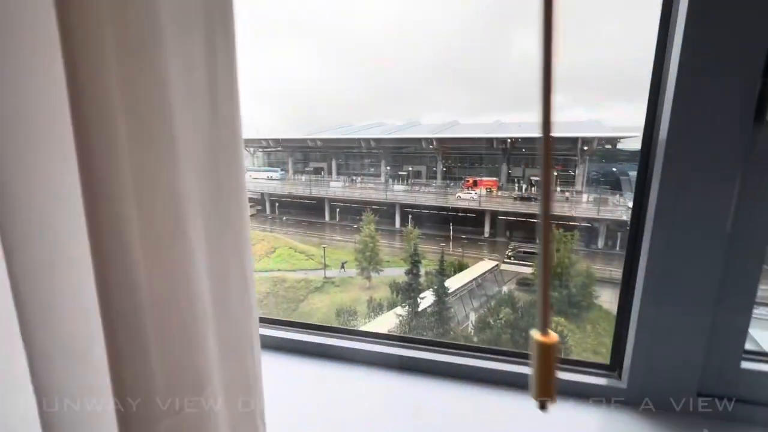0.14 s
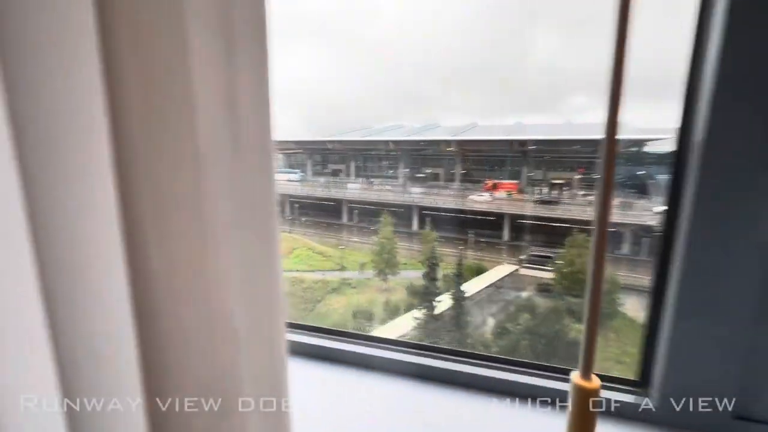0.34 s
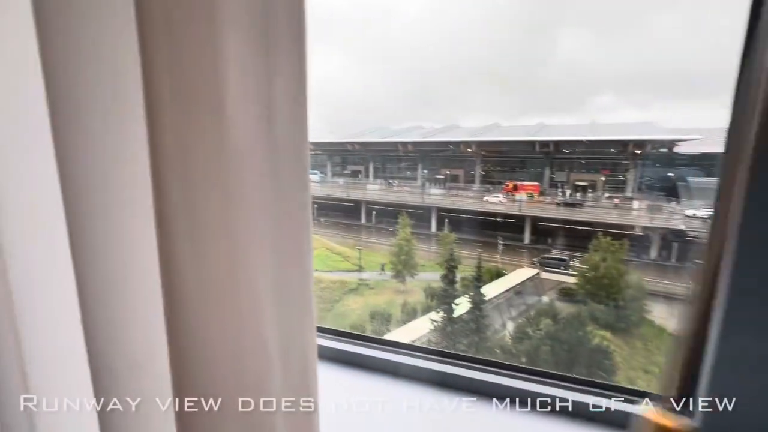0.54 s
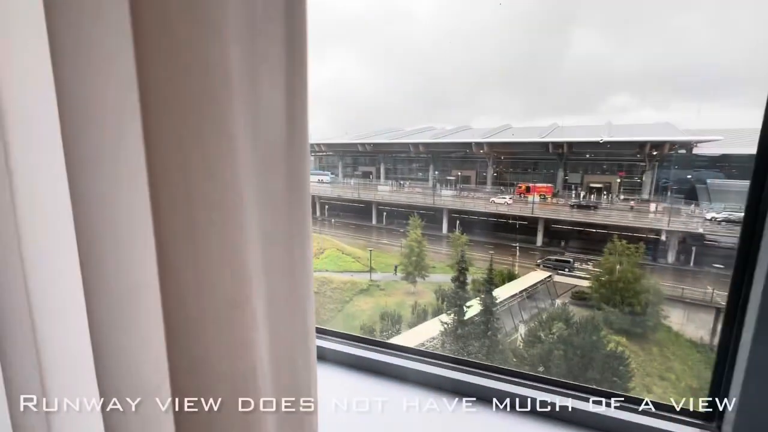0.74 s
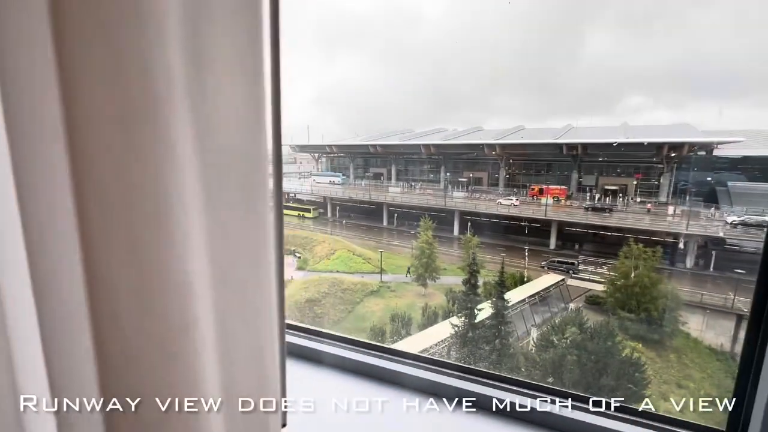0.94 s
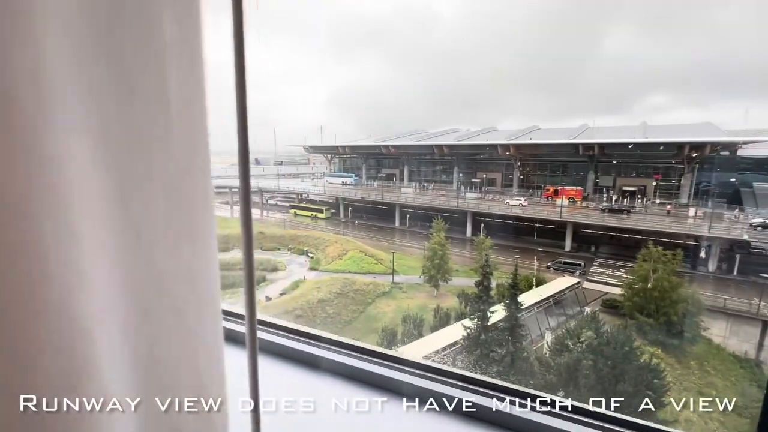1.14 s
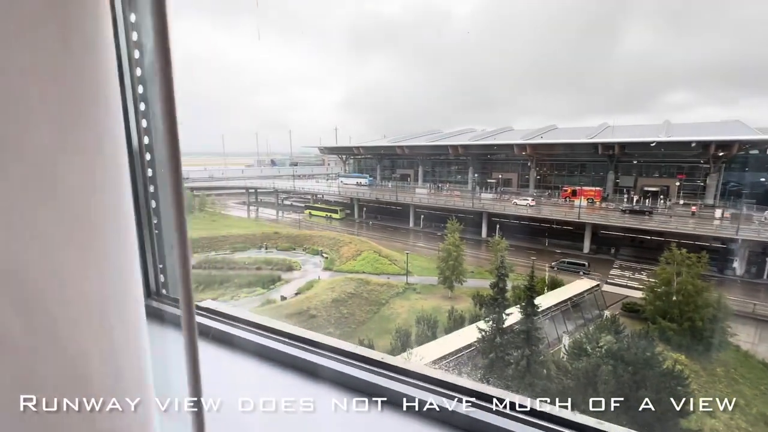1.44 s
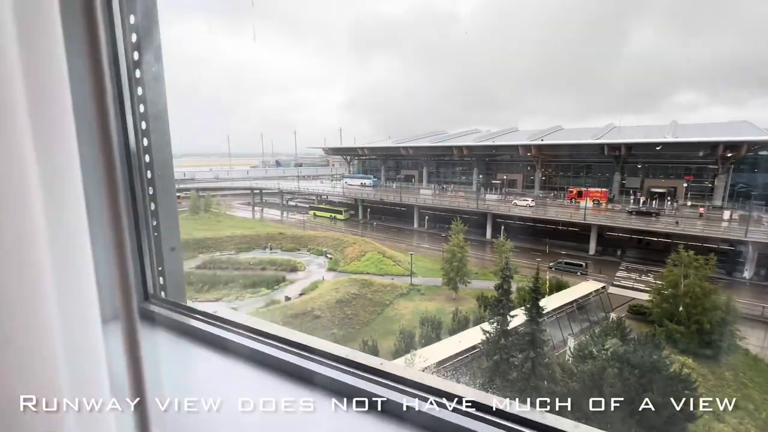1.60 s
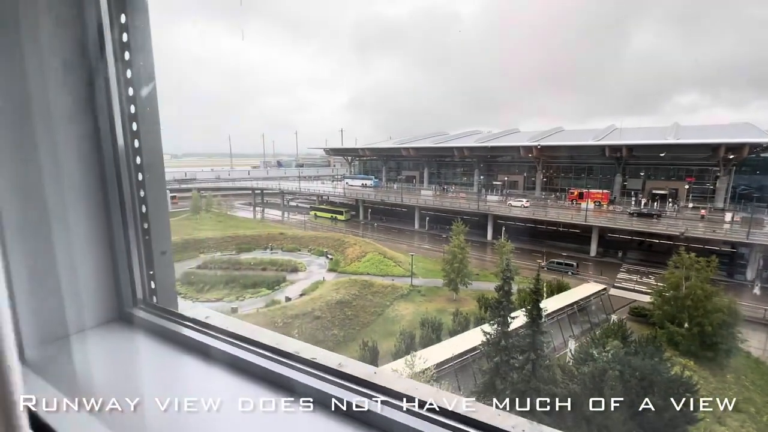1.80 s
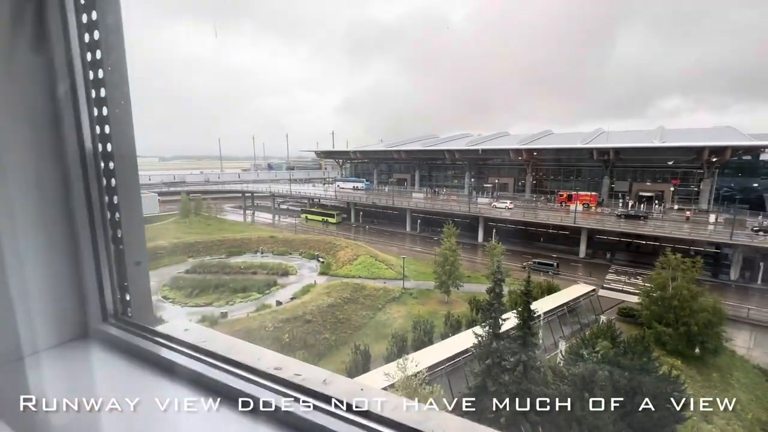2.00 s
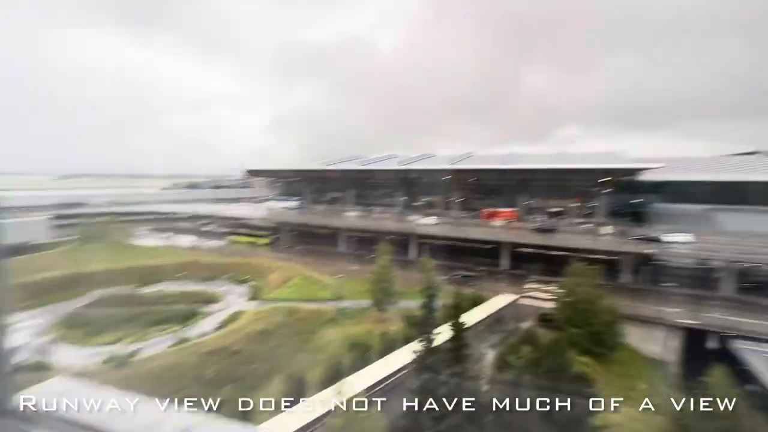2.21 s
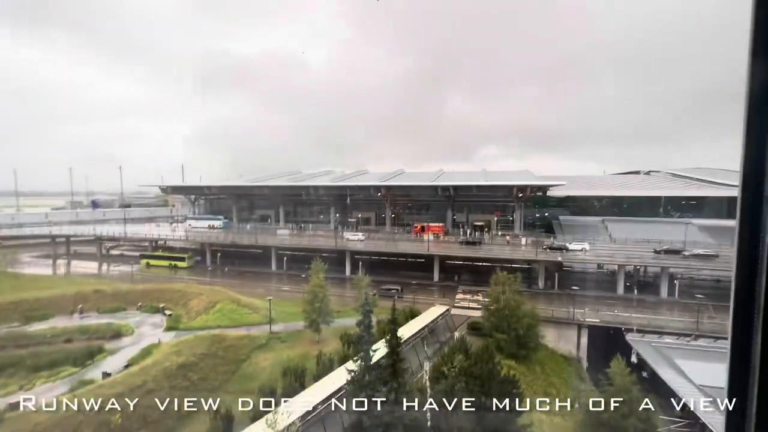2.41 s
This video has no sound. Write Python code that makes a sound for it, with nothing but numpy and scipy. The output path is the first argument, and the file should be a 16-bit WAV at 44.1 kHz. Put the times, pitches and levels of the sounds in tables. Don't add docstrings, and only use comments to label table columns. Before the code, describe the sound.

A curtain is drawn along its track, close up in a quiet room. From about 0.2 to 0.7 seconds gliders rub and make the rail sing, with small ticks until 1.1. At 1.3 they strike the end stop and pile up in clattering knocks, fading by 1.8. At 2.14 a rod cracks and thuds loudly on the window; a softer rebound and cloth rustle follow at 2.3. Low rumble, faint hum and hiss throughout.

```python
import sys
import numpy as np
from scipy import signal
from scipy.fft import rfft, irfft, next_fast_len
from scipy.io import wavfile
from scipy.ndimage import uniform_filter1d, map_coordinates

SR = 44100
rng = np.random.default_rng(int(sys.argv[2]) if len(sys.argv) > 2 else 0)


def file_out(sig):
    cols = np.atleast_2d(sig).T
    lim = np.clip(cols, -1, 1)
    pcm = np.round(lim * 32767).astype(np.int16)
    wavfile.write(sys.argv[1], SR, pcm)


def to_linear_factor(level_db):
    exponent = np.asarray(level_db, float) / 20
    return 10 ** exponent


N = 112454
TIME_S = np.arange(N) / SR


def unit(x):
    return x / np.sqrt(np.mean(x ** 2) + 1e-20)


def along(points, hz):
    f, v = np.transpose(points)
    return np.interp(np.log(hz + 1), np.log(f + 1), v)


def curve(rows):
    s, db = np.transpose(rows)
    return to_linear_factor(np.interp(TIME_S, s, db, -120, -120))


def wobble(rate_hz):
    knots = rng.standard_normal(int(N * rate_hz / SR) + 4)
    return map_coordinates(knots, [np.arange(N) * rate_hz / SR])


def filtered(x, response):
    n = x.shape[-1]
    m = next_fast_len(n + 8192)
    return irfft(rfft(x, m) * response(np.fft.rfftfreq(m, 1 / SR)), m)[..., :n]


def resonant(peaks):
    def response(f):
        total = 0
        for k, (hz, width_hz, db) in enumerate(peaks):
            band = 1j * f * width_hz
            total = total + (-1) ** k * to_linear_factor(db) * band / (hz * hz - f * f + band)
        return total
    return response


def squared(hz, width_hz):
    return lambda f: resonant([(hz, width_hz, 0)])(f) ** 2


def shaped(points):
    return lambda hz: to_linear_factor(along(points, hz))


# freq_hz, likeness_0_to_1
LIKENESS = [(60, 1), (300, 0.82), (1000, 0.32), (4000, 0.062), (10000, 0.13), (12000, 0.64)]


def pair(n, lag_s=0, close=0):
    def mid_side(hz):
        likeness = close + (1 - close) * along(LIKENESS, hz)
        turn = np.arccos(np.clip(likeness, -1, 1)) / 2
        return np.array([np.cos(turn), np.sin(turn)])
    mid, side = filtered(rng.standard_normal((2, n)), mid_side)
    return np.array([np.roll(mid + side, round(lag_s * SR)), mid - side])


def rush(response, patchy_db):
    z = signal.stft(pair(N), nperseg=512)[2]
    field = rng.standard_normal(z.shape[1:])
    field = uniform_filter1d(field, size=6, axis=0)
    field = uniform_filter1d(field, size=8, axis=1)
    noise = signal.istft(z * to_linear_factor(patchy_db * unit(field)), nperseg=512)[1][:, :N]
    return unit(filtered(noise, response))


def add(out, start_s, peak_db, t60_s, pan_db, response, attack_s):
    lag_s, close, grit_db = 0.0004, 0.61, 3
    t = np.arange(SR // 4) / SR
    noise = pair(len(t), lag_s, close)
    grit = np.repeat(rng.standard_normal(len(t)), 30)[:len(t)]
    decay = to_linear_factor(grit_db * grit - 60 * t / max(t60_s, 0.003))
    x = filtered(noise * decay * (1 - np.exp(-t / attack_s)), response)
    x *= to_linear_factor([[peak_db + pan_db / 2], [peak_db - pan_db / 2]]) / np.abs(x).max(1, keepdims=True)
    k = round(start_s * SR)
    out[:, k:k + len(t)] += x[:, :N - k]


# time_s, level_db
RUMBLE_SWELL = [(0, -55.5), (.4, -54), (.65, -50.5), (.9, -56), (1.5, -49), (1.9, -52), (2.55, -48)]
# freq_hz, density_db
RUMBLE_SPECTRUM = [(12, -57), (20, -42), (54, 2.5), (70, -1), (114, -8), (141, -9.5), (260, -19.5),
                   (340, -43), (570, -120)]


def rumble():
    return curve(RUMBLE_SWELL) * to_linear_factor(2.0 * wobble(20)) * rush(shaped(RUMBLE_SPECTRUM), patchy_db=-0.9)


# freq_hz, rms_db
MAINS = [(300, -62.5)]


def hum():
    out = np.zeros((2, N))
    for hz, rms_db in MAINS:
        level = to_linear_factor(rms_db + 3.5 + 0.15 * wobble(22.0))
        phase = 0.074 * wobble(7.2) + np.array([[0], [0.5]])
        out += level * np.sin(2 * np.pi * hz * TIME_S + phase)
    return out


# freq_hz, density_db
AIR_SPECTRUM = [(150, -62), (250, -5), (900, -12), (2200, -11.5), (2700, -23), (4700, -22), (10000, -25.5),
                (12000, -31.5), (16000, -29)]


def air():
    level_db, turn_s, turn_db = -63, 1.68, -7
    turned = 1 / (1 + np.exp((turn_s - TIME_S) / 0.034))
    return to_linear_factor(level_db + turn_db * turned) * rush(shaped(AIR_SPECTRUM), patchy_db=3.5)


# time_s, level_db
CLOTH_SETTLING = [(1.74, -73), (1.82, -75), (1.94, -67), (1.96, -63), (2.1, -69.5), (2.22, -59.5),
                  (2.27, -53), (2.31, -62.5), (2.46, -70), (2.5, -61), (2.55, -69)]
# freq_hz, density_db
CLOTH_SPECTRUM = [(300, 0), (800, 4.5), (2200, -1), (3200, -11), (5500, -15.5), (7500, -28), (15000, -21)]


def cloth():
    return curve(CLOTH_SETTLING) * rush(shaped(CLOTH_SPECTRUM), patchy_db=3.5)


# start_s, wave_db, wave_crest_s (after start), ring_db
WINDOW_BLOWS = [
    (1.302, -23, 0.0034, -33),
    (2.129, -26.5, 0.014, -56),
    (2.1415, -3, 0.0065, -13),
    (2.326, -32.5, 0.0067, -37),
]
# freq_hz, level_db, t60_s
PANE_MODES = [(63.9, -10.5, 0.9), (81.4, 6.5, 0.15), (133.5, 0, 0.17), (174.2, -4, 0.28),
              (268.6, -4.5, 0.24), (311, -2, 0.19), (367, 0, 0.17)]


def thuds():
    pan_db, left_lag_s = -6.5, 0.001
    turns, first_crest_s = 1.45, 0.004
    out = np.zeros((2, N + SR))
    t = np.maximum(np.arange(SR) / SR - np.array([[left_lag_s], [0]]), 1e-6)
    for start_s, wave_db, crest_s, ring_db in WINDOW_BLOWS:
        u = t / crest_s
        swell = (u * np.exp((1 - u ** 2) / 2)) ** 0.78 * (1 - np.exp(-(u / 0.39) ** 4))
        wave = swell * np.cos(2 * np.pi * turns * np.log(t / first_crest_s))
        ring = sum(to_linear_factor(db - 60 * t / t60_s) * np.sin(2 * np.pi * hz * t) for hz, db, t60_s in PANE_MODES)
        ring = ring * (1 - np.exp(-(u / 3.5) ** 2))
        k = round(start_s * SR)
        out[:, k:k + SR] += to_linear_factor(wave_db) * wave + to_linear_factor(ring_db) * ring
    return out[:, :N] * to_linear_factor([[pan_db], [0]])


def rebound():
    start_s, level_db, hz, t60_s, pan_db = 2.3305, -18, 63, 0.14, 2
    u = np.maximum(TIME_S - start_s, 0)
    onset = 1 - np.exp(-(u / 0.007) ** 2)
    flex = to_linear_factor(level_db - 60 * u / t60_s) * onset * np.cos(2 * np.pi * hz * u)
    return flex * to_linear_factor([[pan_db / 2], [-pan_db / 2]])


# start_s, peak_db, t60_s
TIP_CRACK = (2.1415, -8, 0.015)
# freq_hz, width_hz, level_db
ROD_MODES = [(1095, 370, 2.5), (1490, 430, 0), (2350, 390, -6), (5500, 1700, -21), (8900, 3000, -15)]


def rod():
    out = np.zeros((2, N))
    tip = lambda f: resonant(ROD_MODES)(f) / (1 + (f / 4000) ** 2) ** 0.5
    add(out, *TIP_CRACK, 0.5, tip, attack_s=0.00077)
    add(out, TIP_CRACK[0], -22, 0.06, 1.5, squared(500, 350), attack_s=0.0085)
    return out


def end_stop(out):
    add(out, 1.3055, -16, 0.035, 4, squared(3200, 1300), attack_s=0.006)


# start_s, peak_db, t60_s, left_minus_right_db
RAIL_PINGS = [
    (1.352, -40.5, 0.025, 8),
    (1.404, -36.5, .02, 5),
    (1.442, -43.5, 0.028, -1),
    (1.534, -36.5, 0.028, -1.5),
    (1.678, -52, 0.045, 6.5),
    (.275, -43.5, 0.025, 1),
    (0.6647, -33, 0.018, -7),
    (1.0886, -26, 0.02, 0.5),
    (1.2326, -53, 0.015, 2.5),
    (1.3853, -32.5, 0.0096, 3),
]


def pings(out):
    modes = resonant([(1100, 130, 8), (1230, 163, 0), (2900, 2000, -16)])
    rail = lambda f: modes(f) * squared(1500, 1800)(f)
    for start_s, peak_db, t60_s, pan_db in RAIL_PINGS:
        add(out, start_s, peak_db + 6.5, t60_s, pan_db, rail, attack_s=0.0006)


# start_s, peak_db, t60_s, centre_hz, left_minus_right_db
GLIDER_TICKS = [(0.673, -35, 0.06, 11200, -6), (0.7327, -40.5, 0.12, 6400, 4.5),
                (0.7793, -37, 0.033, 4100, 9.5), (0.9298, -55, 0.039, 4250, 15.5),
                (1.0733, -36, 0.18, 6770, 6), (1.0951, -45, 0.11, 4420, 12.5),
                (1.1412, -40, 0.033, 5800, 9), (1.273, -53, 0.12, 9200, -4.0),
                (1.3036, -25, 0.055, 5370, 9), (1.3036, -26.5, .09, 9900, -8), (1.331, -37, .05, 7800, 6),
                (1.336, -39, 0.066, 4700, 1), (1.3688, -29.5, 0.028, 9900, -6),
                (1.371, -32, 0.023, 5970, 2), (1.379, -32, 0.018, 9200, -6),
                (1.399, -33.5, 0.054, 5100, 12), (1.4235, -40, 0.012, 10400, -11),
                (1.388, -28, 0.07, 7400, 7.5), (1.4131, -27, 0.052, 7400, 8),
                (1.4225, -33.5, 0.029, 5240, 6), (1.465, -43.5, 0.024, 8100, -13),
                (1.4984, -31, 0.034, 4750, 8.5), (1.496, -43, 0.014, 10700, -12),
                (1.512, -55.5, 0.018, 9700, -3), (1.529, -48, 0.029, 5100, 2),
                (1.595, -58, 0.028, 4870, 16), (1.672, -42, 0.033, 8200, -3.5),
                (1.675, -47, 0.093, 5500, 13), (1.698, -55, 0.051, 8590, -5),
                (2.169, -47, 0.0093, 9300, -11), (2.207, -53, 0.0087, 7900, -2)]
# freq_hz, width_hz, level_db
GLIDER_MODES = [(4750, 37, -5), (6240, 76, -32), (6700, 29, -7), (7764, 160, 0), (9120, 77, -0.5),
                (10170, 77, -4), (11100, 55, -24)]


def ticks(out):
    dull_hz = 14500
    for start_s, peak_db, t60_s, hz, pan_db in GLIDER_TICKS:
        band = squared(hz, 0.6 * hz)
        body = lambda f: (resonant(GLIDER_MODES)(f) + 0.21) * band(f) / (1 + (f / dull_hz) ** 6)
        add(out, start_s, peak_db + 1.5, t60_s, pan_db, body, attack_s=0.00089)


# start_s, peak_db, t60_s,
# body_db, left_minus_right_db
KNOCK_BLOWS = [(1.306, -10.5, 0.04, -16, -3.5), (1.31, -17, 0.039, -11.5, 6), (1.334, -35, 0.32, -8, -2),
               (1.496, -23, 0.095, -13, -1), (1.529, -29, 0.15, -14, -1.5),
               (1.553, -31.5, 0.046, -10, -4), (1.595, -27.5, 0.071, -13.5, 1),
               (1.773, -38.5, 0.21, -11, -1.5), (1.812, -35.5, 0.11, -9.5, 2.5),
               (1.845, -45.5, 0.2, -3, 0), (2.166, -33.5, 0.027, 6, 4.5), (2.264, -61, 0.071, -12, 1),
               (2.326, -34, 0.025, -2, 8)]
# freq_hz, density_db
CLACK_SPECTRUM = [(260, -52), (380, -6), (680, -10.5), (1300, 3), (1760, -9.5), (3050, -21.5),
                  (3730, -22.5), (4970, -25.5), (14000, -45)]
# freq_hz, width_hz, level_db
PELMET_MODES = [(223, 68, 3.5), (381, 95, 1)]


def knocks(out):
    for start_s, peak_db, t60_s, body_db, pan_db in KNOCK_BLOWS:
        add(out, start_s, peak_db - 0.5, t60_s, pan_db, shaped(CLACK_SPECTRUM), attack_s=0.00074)
        pelmet_db = peak_db + body_db + 2.5
        add(out, start_s, pelmet_db, 1.56 * t60_s, pan_db, resonant(PELMET_MODES), attack_s=0.00086)


def contacts():
    out = np.zeros((2, N))
    end_stop(out)
    pings(out)
    ticks(out)
    knocks(out)
    return out


def glider_hiss():
    centre_s, half_length_s, level_db = 0.582, 0.028, -46
    swell = np.exp(-((TIME_S - centre_s) / half_length_s) ** 2)
    return to_linear_factor(level_db) * swell * rush(squared(3500, 1800), patchy_db=1.5)


# time_s, level_db
RUB_STRENGTH = [(.17, -66), (.24, -57), (.29, -45), (.39, -41), (.5, -43), (.59, -41.5), (.68, -38.5),
                (.7, -54.5), (.75, -60), (.765, -51.5), (.8, -53.5), (.87, -68), (1.21, -75), (1.235, -59),
                (1.285, -63.5), (1.33, -38), (1.46, -60), (1.72, -65.5)]
# freq_hz, density_db
RUB_SPECTRUM = [(290, -51), (500, -23), (919, -19), (1130, 0.5), (1480, -14.5), (4730, -21), (10700, -28),
                (14700, -39), (16000, -59)]
# freq_hz, width_hz, level_db
RAIL_MODES = [(1105, 9.8, 5), (1751, 23, -8), (2196, 84, -16), (2705, 36, -19), (3120, 64, -22.5),
              (3620, 47, -18), (4735, 70, -16.5), (5730, 160, -18.5), (7280, 530, -22.5),
              (1036, 43, -6.5), (1175, 140, -14.5)]
# freq_hz, left_minus_right_db
TRACK_PAN = [(1300, 1), (2400, 8.5), (4400, 13.5), (8000, 4.5), (12000, -7.5)]


def slide():
    rub_db, sing_db, chatter_db = -2.5, -2, 3
    sing_grows = 1.22
    strength = curve(RUB_STRENGTH)
    rub = to_linear_factor(rub_db + 2.2 * wobble(60.8)) * rush(shaped(RUB_SPECTRUM), patchy_db=3.0)
    sing = to_linear_factor(sing_db + chatter_db * wobble(45.75))
    sing = sing * rush(resonant(sorted(RAIL_MODES)), patchy_db=-3.0)
    sing *= (strength / strength.max()) ** (sing_grows - 1)
    pan = lambda hz: to_linear_factor(along(TRACK_PAN, hz) * np.array([[0.5], [-0.5]]))
    return filtered(strength * (rub + sing) + glider_hiss(), pan)


# freq_hz, t60_s
ROOM_DECAY = [(200, 0.95), (2000, 0.25), (10000, 0.32)]


def room(x):
    hz, t, z = signal.stft(rng.standard_normal((2, SR // 2)), SR, nperseg=256)
    decay = to_linear_factor(-60 * t / along(ROOM_DECAY, hz)[:, None])
    tail = signal.istft(z * decay, SR, nperseg=256)[1]
    delayed = np.pad(x, ((0, 0), (300, 0)))
    return signal.fftconvolve(delayed, tail / np.linalg.norm(tail[0]), axes=1)[:, :N]


def scene():
    room_db, tip_send_db = -12.5, -17
    background = hum() + rumble() + cloth() + air()
    tip = rod()
    track = slide() + contacts()
    answer = to_linear_factor(room_db) * room(track + to_linear_factor(tip_send_db) * tip)
    return track + tip + answer + thuds() + rebound() + background


# freq_hz, width_hz, depth_0_to_1
PORT_NOTCHES = [(7480, 356, 0.81), (9080, 110, 0.8)]


def ports(hz):
    gain = (hz < 16350) / (1 + (hz / 15000) ** 8)
    for centre_hz, width_hz, depth in PORT_NOTCHES:
        gain = gain * (1 - np.clip(depth, 0, 1) * np.exp(-((hz - centre_hz) / width_hz) ** 2))
    return gain


def top_cut(x):
    return signal.sosfilt(signal.butter(12, 16370, fs=SR, output="sos"), x)


def record(dry):
    mix = filtered(dry, ports)
    return top_cut(mix)


dry = scene()
out = record(dry)
file_out(out)
```